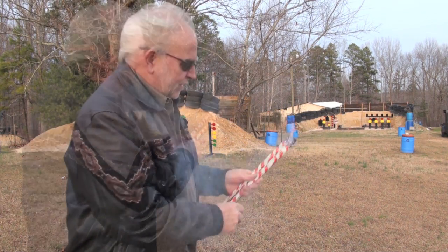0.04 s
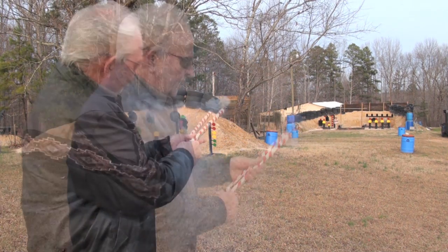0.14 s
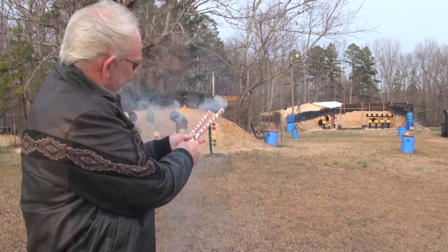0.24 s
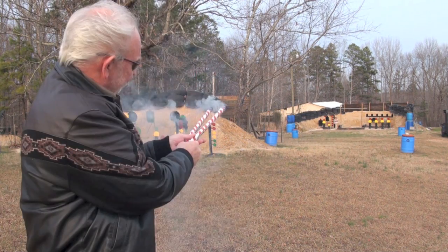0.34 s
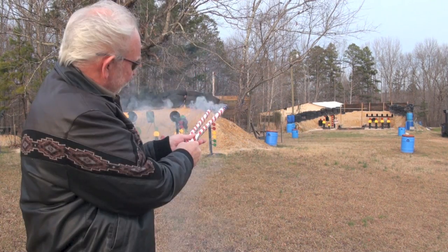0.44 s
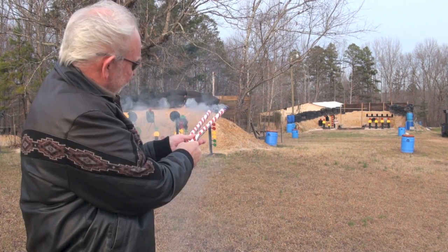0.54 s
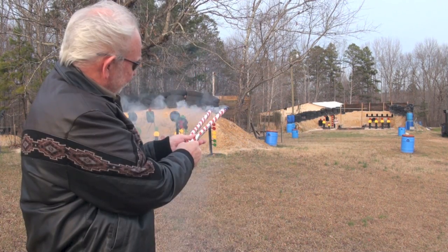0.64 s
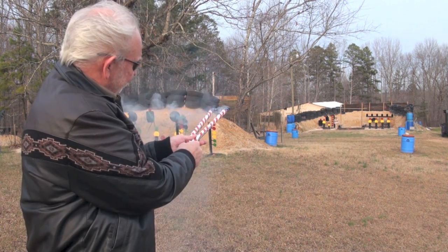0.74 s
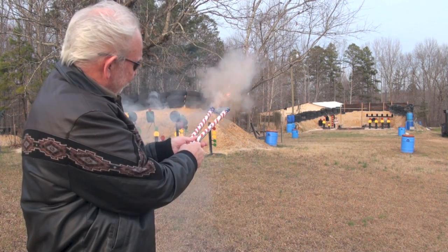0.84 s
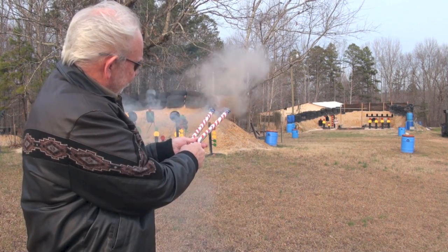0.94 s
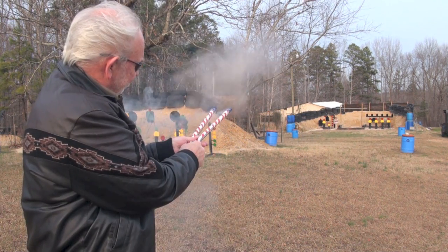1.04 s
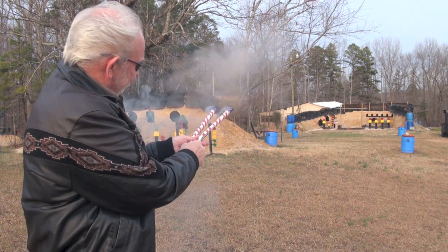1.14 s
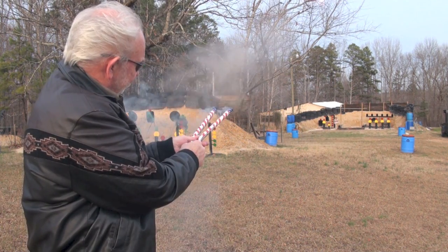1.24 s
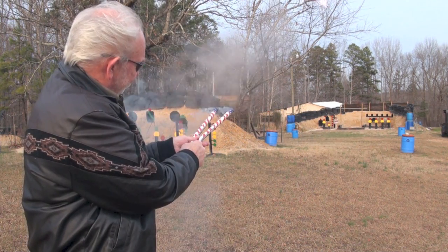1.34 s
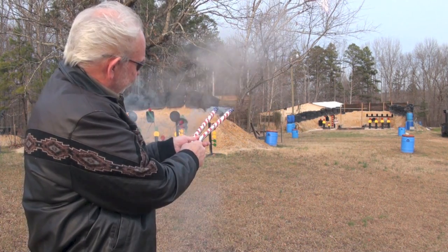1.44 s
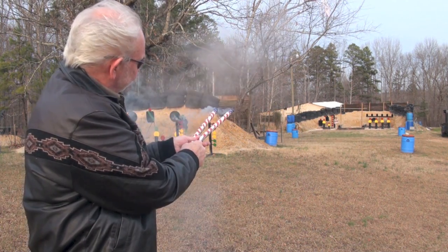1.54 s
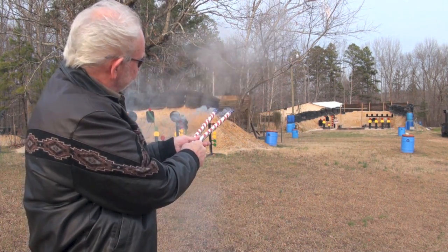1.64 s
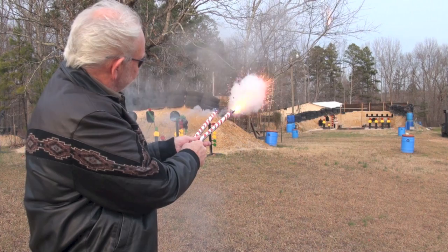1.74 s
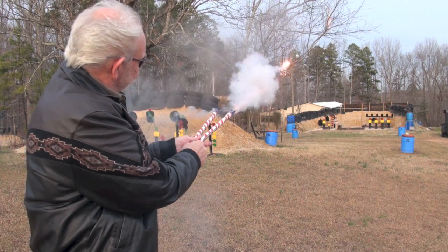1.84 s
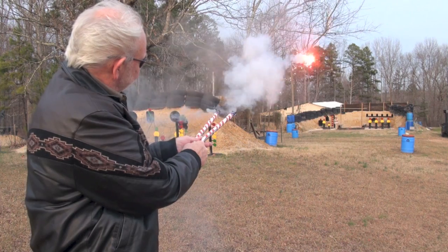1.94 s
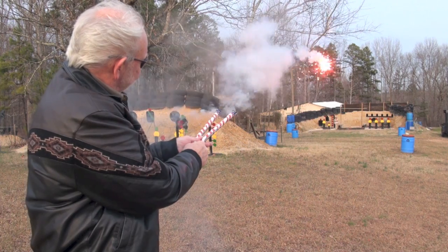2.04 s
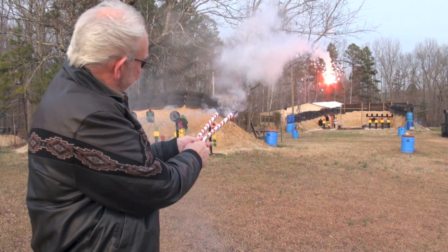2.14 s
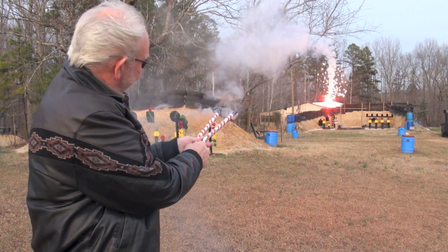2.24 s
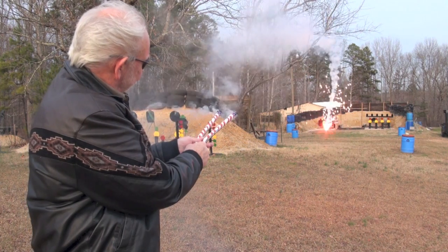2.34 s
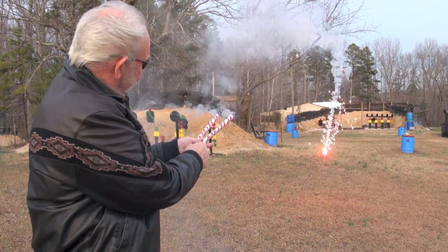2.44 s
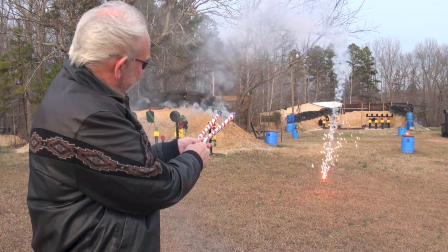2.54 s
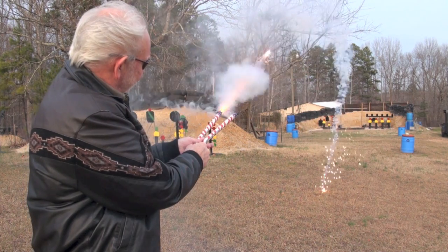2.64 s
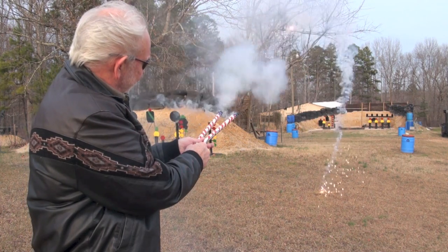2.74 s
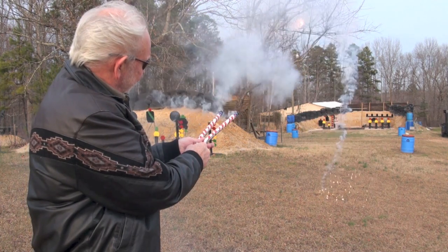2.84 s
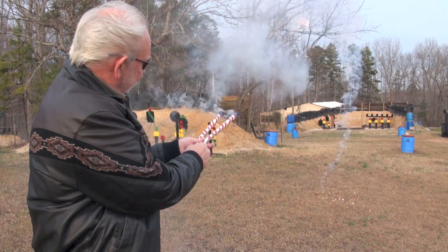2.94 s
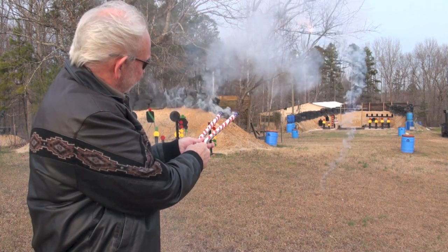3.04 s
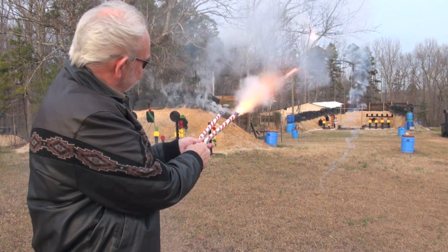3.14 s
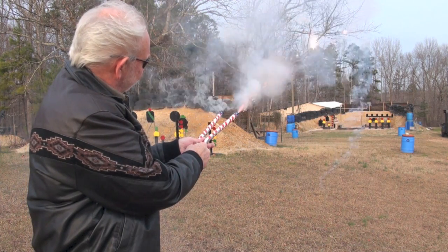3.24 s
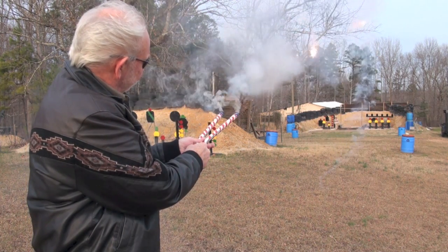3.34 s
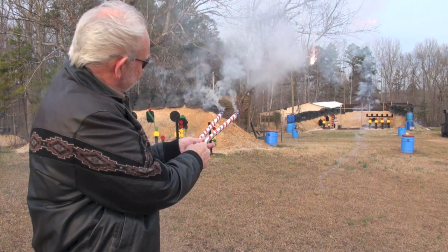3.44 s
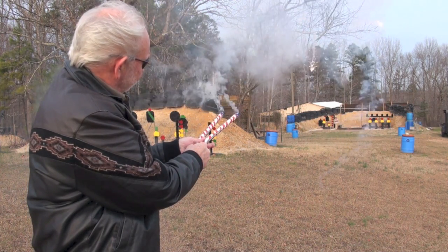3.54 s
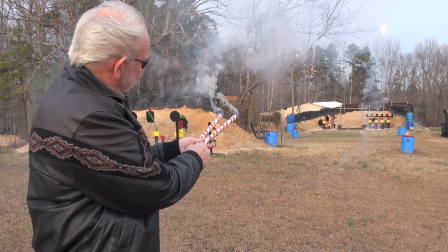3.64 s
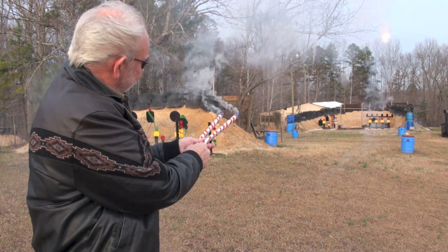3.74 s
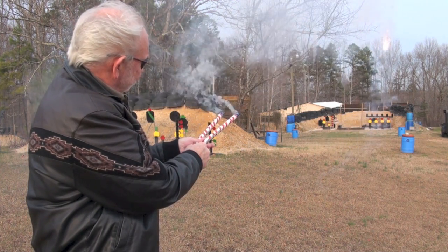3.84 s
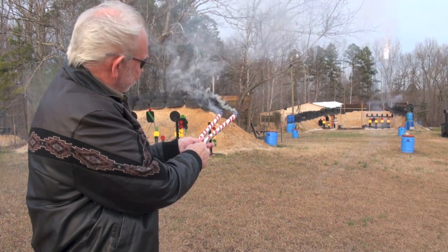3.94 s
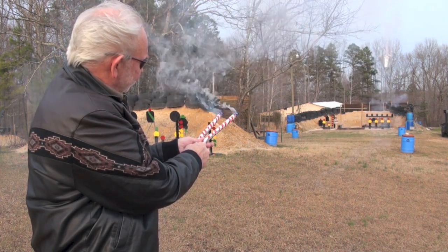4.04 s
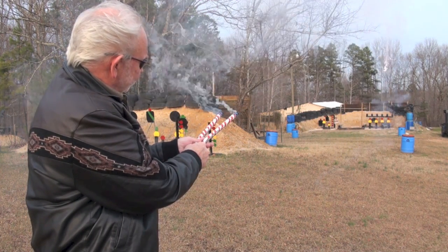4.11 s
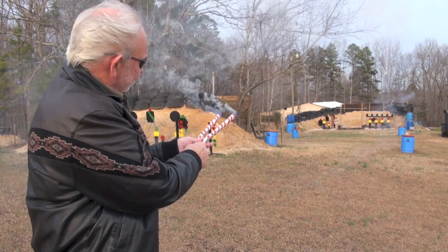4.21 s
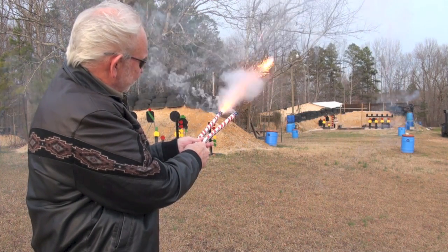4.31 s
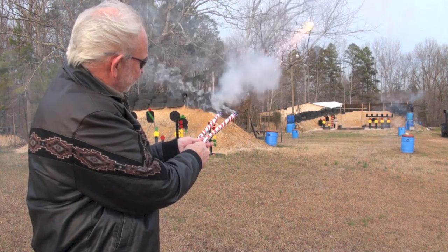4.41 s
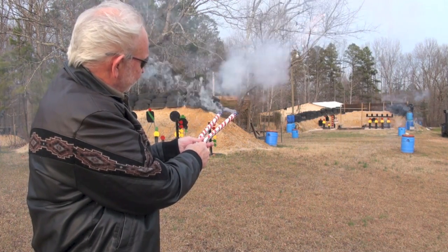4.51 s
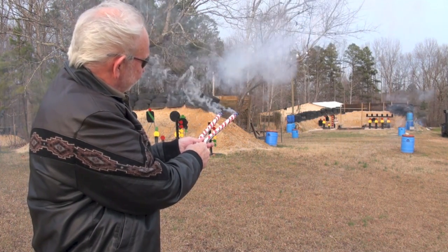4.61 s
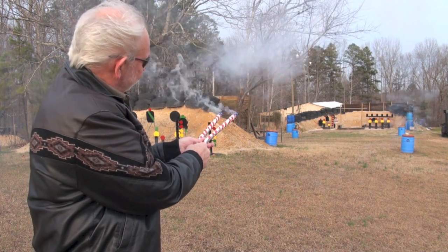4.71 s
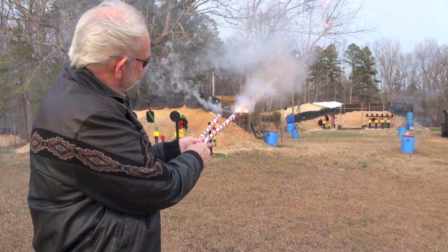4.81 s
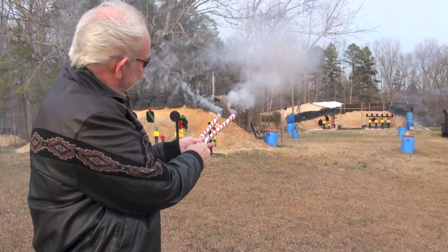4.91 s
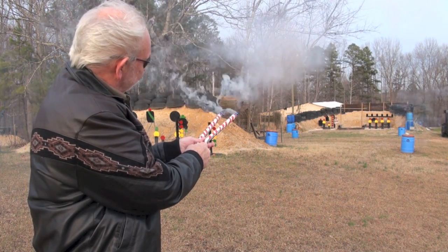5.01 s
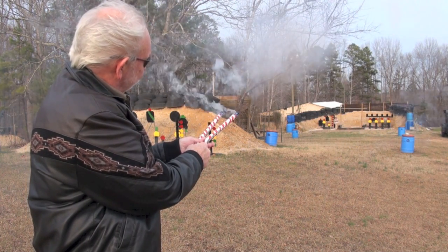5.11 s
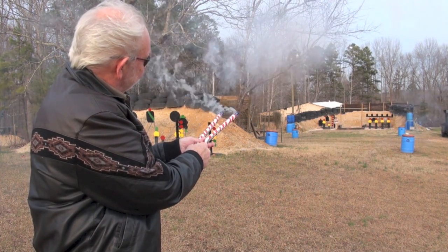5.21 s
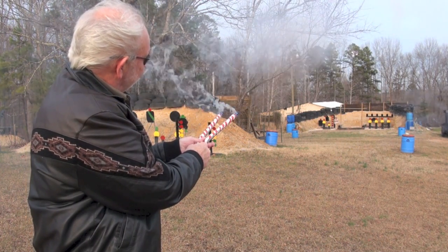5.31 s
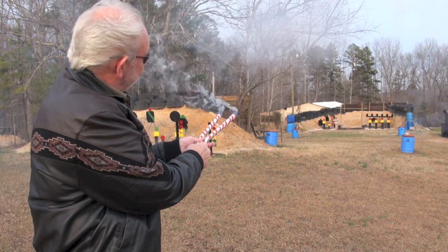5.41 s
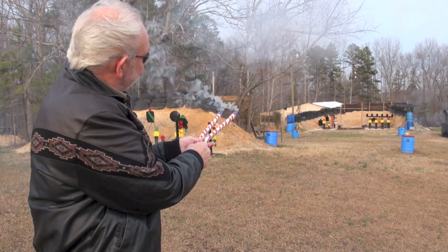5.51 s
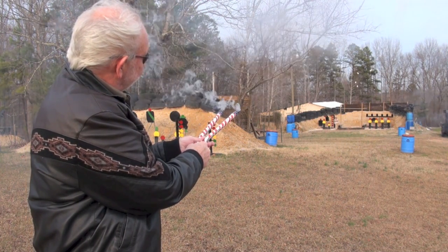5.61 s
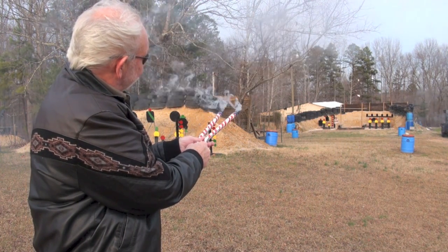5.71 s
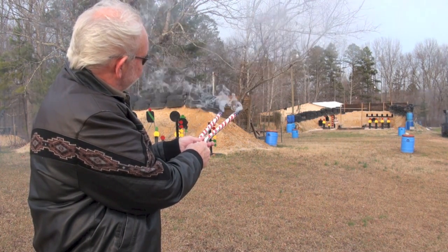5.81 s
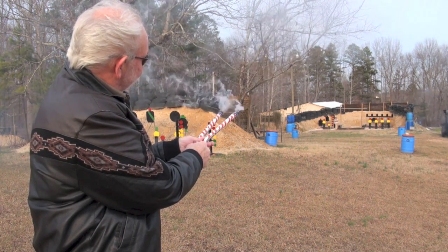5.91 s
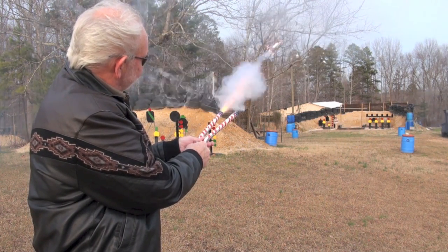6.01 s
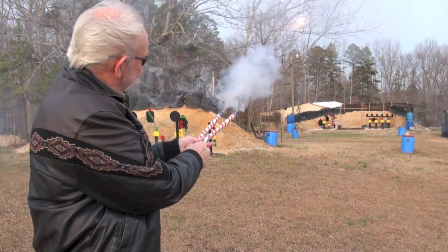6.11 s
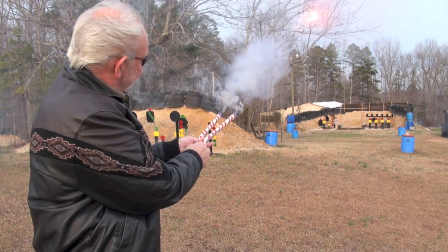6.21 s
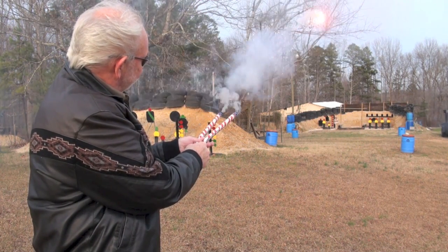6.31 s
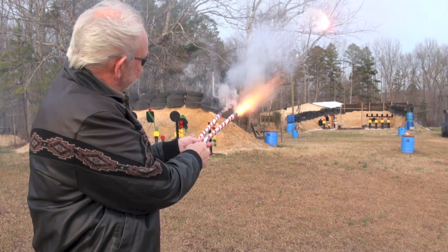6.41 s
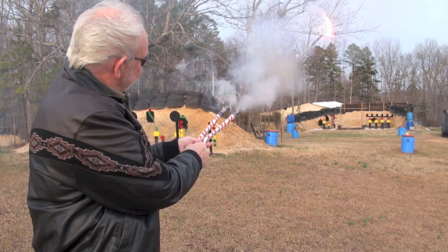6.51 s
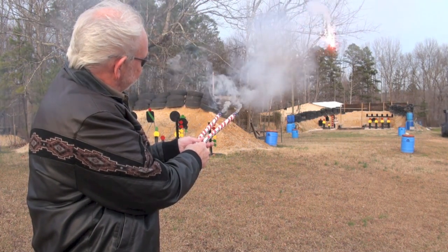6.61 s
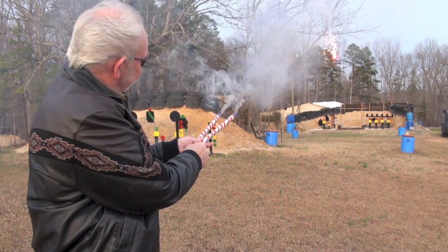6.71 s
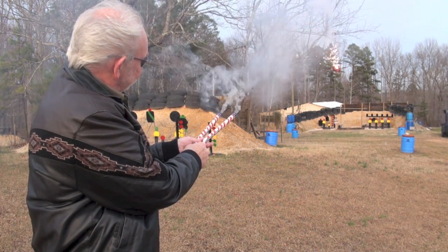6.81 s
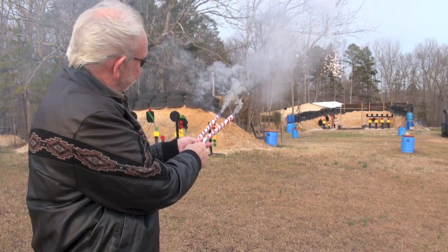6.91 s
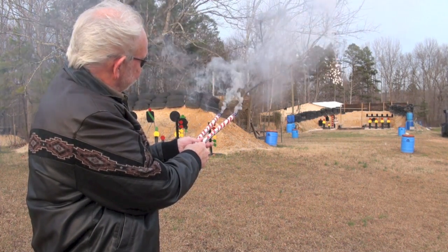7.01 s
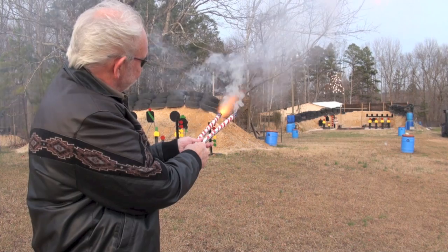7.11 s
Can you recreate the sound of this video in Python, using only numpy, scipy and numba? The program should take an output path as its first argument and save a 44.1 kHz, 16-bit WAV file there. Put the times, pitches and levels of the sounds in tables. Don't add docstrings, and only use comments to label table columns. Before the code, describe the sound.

Irregular hard firework pops with short breathy gas bursts, a steady powder hiss, a faint distant engine drone, and open-field echoes after the hardest shots.

```python
import sys
import numpy as np
from scipy import signal
from scipy.fft import rfft, irfft, next_fast_len
from scipy.io import wavfile
from scipy.ndimage import uniform_filter1d
from numba import njit

SR = 44100
rng = np.random.default_rng(int(sys.argv[2]) if len(sys.argv) > 2 else 0)


def makeup_ratio(level_db):
    decades = np.asarray(level_db, float) / 20
    return 10 ** decades


def generate_wav(signal):
    frames = np.transpose(np.atleast_2d(signal))
    scaled = np.clip(frames, -1, 1) * 32767
    pcm = np.round(scaled).astype(np.int16)
    wavfile.write(sys.argv[1], SR, pcm)


N = 315756
T = np.arange(N) / SR
LONG = next_fast_len(N, True)
LR = np.array([[1.], [-1.]])


def unit(x):
    return x / np.sqrt(np.mean(x ** 2))


def colour(x, points, tilt_db=0):
    hz = np.maximum(np.arange(x.shape[-1] // 2 + 1) * SR / x.shape[-1], 1)
    p = np.array(points)
    db = np.interp(np.log(hz), np.log(p[:, 0]), p[:, 1])
    db = db + tilt_db * np.log2(np.clip(hz, 200, 9000) / 1500)
    return unit(irfft(rfft(x) * makeup_ratio(db), x.shape[-1]))


def low(x, hz, order=1):
    return signal.sosfilt(signal.butter(order, min(hz, SR / 2.2), fs=SR, output="sos"), x)


def walk(rate):
    hold = max(int(SR / rate), 24)
    w = rng.standard_normal(16384)[np.arange(N) // hold]
    w = uniform_filter1d(uniform_filter1d(w, hold), hold)
    return w / w.std()


def add(out, s, piece, pan_db=0):
    i = int(s * SR)
    n = min(piece.shape[-1], N - i)
    out[:, i:i + n] += (piece * makeup_ratio(LR * pan_db / 2))[:, :n]


# t/s, firing rate f/Hz, rumble level/dB, third multiple above it level/dB
ENGINE_RUN = [(0, 44.35, -53, -16), (.3, 44.9, -50, 6), (1.2, 46.26, -41.5, -10), (1.5, 46.7, -41, 1),
              (2.2, 47.7, -38, 0.3), (2.6, 48.48, -37.5, -6), (4.0, 49.77, -38, -8),
              (4.4, 48.6, -40.5, -15), (5.7, 46.05, -41, -15), (7.16, 45.65, -40.5, -20)]
FIRING_ORDERS = (2, 3, 4)
# firing rate f/Hz, gain level/dB
EXHAUST_BOOMS = [
    (45, 16),
    (49.6, 8.5),
]
EVEN_DB, BOOM_WIDTH_HZ = -16.5, 0.56
# f/Hz, level/dB per Hz
RUMBLE_SPECTRUM = [(10, -45), (20, -28), (30, -21), (48, -15.5), (78, -4), (95, -1), (118, -4), (150, 1),
                   (200, -6), (260, -17), (400, -41.5)]
# t/s, f/Hz, level/dB
MACHINE_WHINES = [
    [(0, 336, -73), (5.0, 336, -73), (5.3, 336, -54.5), (6.4, 336, -49), (7.16, 336, -50.5)],
    [(0, 155, -74), (2.1, 155, -62), (2.45, 160, -36), (2.9, 165, -51), (3.4, 160, -48), (3.75, 163, -38),
     (4.2, 170, -54), (4.5, 172, -65), (7.16, 172, -72)],
]


def engine():
    s, *columns = np.transpose(ENGINE_RUN)
    hz, rumble_db, third_db = (np.interp(T, s, c) for c in columns)
    odd_db = rumble_db + third_db
    boom_db = sum(db * np.exp(-((hz - at) / BOOM_WIDTH_HZ) ** 2) for at, db in EXHAUST_BOOMS)
    even_db = rumble_db + EVEN_DB + boom_db
    phase = 2 * np.pi * np.cumsum(hz * (1 + .002 * walk(6))) / SR
    tones = 0
    for k in FIRING_ORDERS:
        order_db = odd_db if k % 2 else even_db
        tones = tones + makeup_ratio(order_db + 1.3 * walk(8)) * np.sin(k * phase)
    for rows in MACHINE_WHINES:
        s, hz, db = np.transpose(rows)
        phase = 2 * np.pi * np.cumsum(np.interp(T, s, hz) * (1 + 0.0033 * walk(12))) / SR
        tones = tones + makeup_ratio(np.interp(T, s, db) + 3.2 * walk(20)) * np.sin(phase)
    mid, side = colour(rng.standard_normal((2, LONG)), RUMBLE_SPECTRUM)[:, :N]
    return makeup_ratio(rumble_db + 0.9 * walk(9)) * (mid + 0.052 * side * LR) + tones


@njit
def tube(x, hz, back, damp):
    y, soft = np.zeros(len(x)), 0.
    for i in range(64, len(hz)):
        at = i - SR / (2 * hz[i]) + damp / (1 - damp)
        j = int(at)
        past = y[j] + (at - j) * (y[j + 1] - y[j])
        soft += (1 - damp) * (past - soft)
        y[i] = x[i] * np.sqrt(1 - back[i] ** 2) - back[i] * soft
    return y


# t/s, level/dB, tilt/dB per octave
POWDER_BURN = [(0, -35, 2.6), (.3, -47.5, -1.5), (.55, -54, -3), (.9, -58, -1.2), (1.08, -51.5, 1.5),
               (1.76, -48, -1.5), (1.92, -39, 0), (2.83, -41.5, -0.7), (2.95, -43, -0.8), (4.31, -46, 1.8),
               (4.44, -46, -2), (4.87, -44, 0.5), (4.99, -40, 1), (5.5, -43, 0.4), (6.02, -50, -1.3),
               (6.54, -43.5, 0), (6.67, -39, -.5), (7.16, -43.5, 1)]
# peak t/s, gain level/dB
POWDER_FLARES = [
    (3.36, 4),
    (6.22, 3.5),
]
FLARE_RISE_S, FLARE_FALL_S = 0.091, 0.19
# t/s, level/dB
ROAD_WASH = [(0, -61), (.45, -46.5), (1.5, -42.5), (3.1, -42), (4.4, -43.5), (5.1, -45.5), (5.9, -50.5),
             (7.16, -45)]
REGION_EDGES_HZ = (250, 1000, 2500, 7000)
BURN_SHARES_DB = (-7, -4, -0.1, -3.5)
ROAD_SHARES_DB = (-0.2, -5.5, -22, -32)
# f/Hz, level/dB per Hz
HISS_SPECTRUM = [(130, -30), (220, 0), (300, -3), (500, 0), (1200, -5), (2500, -8.5), (5000, -9),
                 (9500, -13.5), (11800, -15), (14500, -26), (16000, -37)]
# t/s, f/Hz, reflection/0-1
TUBE_RINGING = [
    [(0, 2270, 0.01), (1.75, 2320, 0), (1.88, 2518, 0.95), (2.05, 2080, 0.52), (2.25, 1840, 0.45),
     (2.65, 1800, 0.32), (2.8, 1800, 0.23), (4.8, 1500, 0), (7.16, 1286, 0)],
    [(0, 1270, 0.18), (.3, 1300, 0), (1.0, 1460, 0.1), (1.75, 1430, 0.56), (1.9, 1450, 0),
     (2.3, 1460, 0.13), (2.8, 1430, 0.17), (3.3, 1420, 0.33), (4.3, 1350, 0.36), (4.5, 1287, 0.13),
     (4.9, 1080, 0.25), (5.7, 1064, 0.38), (6.1, 960, 0.19), (6.8, 890, 0.23), (7.16, 860, 0.3)],
]


def hiss():
    s, *controls = np.transpose(POWDER_BURN)
    burn_db, tilt_db = (np.interp(T, s, c) for c in controls)
    for at, db in POWDER_FLARES:
        width = np.where(T < at, FLARE_RISE_S, FLARE_FALL_S)
        burn_db = burn_db + db * np.exp(-((T - at) / width) ** 2)
    road_db = np.interp(T, *np.transpose(ROAD_WASH))
    octaves = np.log2(np.array(REGION_EDGES_HZ) / REGION_EDGES_HZ[2])
    levels = []
    for burn_share, road_share, octave in zip(BURN_SHARES_DB, ROAD_SHARES_DB, octaves):
        burn = makeup_ratio(burn_db + burn_share + octave * tilt_db)
        road = makeup_ratio(road_db + road_share)
        levels.append(20 * np.log10(np.hypot(burn, road)))

    mid, side = colour(rng.standard_normal((2, LONG)), HISS_SPECTRUM)
    mid = mid[:N] * makeup_ratio(0.74 * walk(400))
    for rows in TUBE_RINGING:
        at, hz, back = np.transpose(rows)
        mid = tube(mid, np.interp(T, at, hz), np.clip(np.interp(T, at, back), 0, .8), 0.48)

    both = rfft([mid, side[:N]], LONG)
    log_hz = np.log2(np.arange(LONG // 2 + 1) * SR / LONG + 1)
    steps = [1 / (1 + np.exp(-13 * (log_hz - np.log2(edge)))) for edge in REGION_EDGES_HZ] + [0]
    sputter, out = walk(14), 0
    for k, (db, wide) in enumerate(zip(levels, (0.33, 0.31, 0.035, 0.012))):
        m, w = irfft(both * (steps[k] - steps[k + 1]), LONG)[:, :N]
        flicker_db = 0.9 * sputter + 1.0 * walk(9)
        out = out + makeup_ratio(db + flicker_db) * (unit(m) + wide * unit(w) * LR)
    return out


FIELD_T60_S, FIELD_DB, FIELD_HZ = 0.38, -26, 2000


def field(x):
    t = T[:SR]
    tail = rng.standard_normal((2, SR)) * makeup_ratio(-60 * t / FIELD_T60_S) * (1 - np.exp(-t / 0.0047))
    tail = low(tail[0] + .5 * tail[1] * LR, FIELD_HZ)
    tail = tail / np.sqrt(np.sum(tail ** 2) / 2)
    return makeup_ratio(FIELD_DB) * signal.fftconvolve(x[None], tail, axes=1)[:, :N]


def pop(hz, db):
    u = (np.arange(1024) / SR - .008) * hz * np.pi
    edge = 4 * u + 1.5
    u = np.where(u > 0, 0.64 * u, u)
    pulse = (1 - 2 * u ** 2) * np.exp(-u ** 2)
    crack = 0.35 * edge * np.exp(-edge ** 2)
    return makeup_ratio(db) * (pulse + crack)


# t/s, echo level/dB, tilt/dB per octave, far echoes level/dB, extra slap level/dB
HARD_SHOTS = [
    (.895, -1.5, 0.5, 0, -0.5),
    (4.8403, -10, -2, -5, 0),
    (6.507, -8.5, -2.5, -3.5, 6),
]
# delay t/s, rush level/dB, slap peak level/dB, slap f/Hz, left minus right level/dB
NEAR_REFLECTORS = [(.0233, -21.5, -9, 1470, 15), (.038, -22.5, -18.5, 1200, 10),
                   (.054, -19.5, -15, 900, 12), (.076, -15, -16.5, 1600, -0.5),
                   (.0845, -14.5, -3.5, 1300, 0.5), (.095, -20, -16, 1400, 3), (.112, -25, -23.5, 800, 3),
                   (.138, -31, -37.5, 900, 2)]
FAR_REFLECTORS = [(.172, -27, -13, 2000, -8), (.190, -27.5, -14, 900, 9), (.216, -26.5, -13, 1610, -5),
                  (.236, -24.5, -9, 2600, -2), (.261, -34, -13, 1900, 2), (.285, -28, -20, 1510, 3),
                  (.332, -28, -19, 900, 2), (.358, -27, -16, 1020, 2), (.385, -33, -24, 2000, 7),
                  (.42, -38, -21, 1200, 5)]
# f/Hz, level/dB per Hz
ECHO_SPECTRUM = [(35, -45), (60, -16), (560, -4), (900, -7.5), (1300, -5), (2250, -6.5), (2800, -13),
                 (4500, -11), (5600, -18), (7400, -20), (9000, -25.5), (13600, -29), (16000, -50)]
# f/Hz, level/dB per Hz
WOODS_SPECTRUM = [(150, -30), (500, -11), (1100, -1.5), (2250, -0.5), (2750, -15.5), (4400, -12.5),
                  (5300, -27), (16000, -47)]
AIR_DB = -29
SMEAR_S, SMEAR_PER_DB = .009, 1.02
WASH_DB, WASH_T60_S, WASH_DELAY_S = -25, 1.68, .17


def echoes():
    out = np.zeros((2, N))
    noise = rng.standard_normal((2, N)) * makeup_ratio(2.86 * walk(350))
    t = np.arange(8192) / SR - .09
    for s, near_db, tilt_db, far_db, sharp_db in HARD_SHOTS:
        for table, gain_db in ((NEAR_REFLECTORS, near_db), (FAR_REFLECTORS, near_db + far_db)):
            for delay, rush_db, slap_db, hz, pan_db in table:
                smear = SMEAR_S * makeup_ratio(SMEAR_PER_DB * (rush_db - slap_db))
                start = s + delay - .09
                i = int(start * SR)
                mid, side = colour(noise[:, i:i + len(t)], ECHO_SPECTRUM, tilt_db + AIR_DB * delay / 3)
                shape = np.exp(-np.where(t < 0, .5, .2) * (t / max(smear, 1e-3)) ** 2)
                add(out, start, makeup_ratio(rush_db + gain_db) * shape * (mid + .3 * side * LR), pan_db)
                peak_db = slap_db + gain_db + sharp_db * (1.3 - delay / .25)
                add(out, s + delay - .008, pop(hz * 2 ** (.1 * tilt_db), peak_db), pan_db)
        mid, side = colour(rng.standard_normal((2, 32768)), WOODS_SPECTRUM, tilt_db - .6)
        late = T[:len(mid)]
        decay = makeup_ratio(WASH_DB + near_db + far_db - 60 * late / WASH_T60_S)
        swell = (1 - np.exp(-late / .02)) * decay
        add(out, s + WASH_DELAY_S, swell * (mid + 0.13 * side * LR))
    return out


GROUND_S, GROUND_DB, GROUND_HZ = .00483, -5, 3550


def ground(x, db):
    return x + makeup_ratio(db) * low(np.interp(T - GROUND_S, T, x, left=0), GROUND_HZ)


# peak t/s, hold t/s, level/dB, tilt/dB per octave
GAS_SPITS = [(0.889, 0.0013, -34, 3), (0.8944, 0.0011, -6.5, 3), (1.785, 0.014, -23.5, 4),
             (2.669, 0.015, -21, 3), (3.202, 0.0034, -15.5, -1), (4.369, .0073, -17, 2.5),
             (4.818, 0.0046, -33, 0), (4.829, 0.002, -16, 0), (6.025, 0.016, -20, 3),
             (6.495, 0.0053, -22, -1.5), (6.895, 0.0017, -20.5, 4.5)]
SPIT_RISE, SPIT_T60_S, SPIT_T60_PER_HOLD = 0.34, 0.013, 1.7
# peak t/s, hold t/s, t60 t/s, level/dB, tilt/dB per octave
GAS_BLASTS = [(0.904, .012, .093, -24, 4), (1.798, 0.03, .34, -16.5, -.5), (1.932, 0.074, 0.4, -39, 2.5),
              (2.687, .022, .17, -14.5, -0.5), (2.773, .008, .1, -42, 10), (3.212, 0.022, 0.2, -18, -1),
              (4.381, 0.012, .14, -15, -.5), (4.447, .025, .14, -34, -1.5), (4.839, 0.0064, 0.06, -15, 1.5),
              (6.043, 0.031, .14, -12.5, .5), (6.16, .006, 0.067, -39.5, 2), (6.197, .005, .05, -47, 6.5),
              (6.507, 0.0066, 0.068, -18, 2), (6.908, 0.013, .12, -29, 4.5)]
BLAST_RISE = 0.14
# start t/s, length t/s, level/dB, tilt/dB per octave
FIZZ_TRAILS = [
    (.18, .29, -45.5, 5),
    (2.77, 0.2, -42, 11),
    (4.406, .098, -41.5, 12),
    (4.858, .092, -31.5, 6),
    (6.1, 0.11, -47.5, 13),
    (6.53, 0.077, -34.5, 3),
]
TRAIL_RISE_S, TRAIL_T60_S = 0.009, .06
# peak t/s, rise t/s, hold t/s, t60 t/s, level/dB, tilt/dB per octave
FUSE_FLARE = (0.3, .28, -0.07, 0.34, -38.5, 4)


def jet_rows():
    rows = []
    for s, hold, db, tilt in GAS_SPITS:
        rows.append((s, SPIT_RISE * hold, hold, SPIT_T60_S + SPIT_T60_PER_HOLD * hold, db, tilt))
    for s, hold, t60, db, tilt in GAS_BLASTS:
        rows.append((s, BLAST_RISE * hold, hold, t60, db, tilt))
    for s, hold, db, tilt in FIZZ_TRAILS:
        rows.append((s, TRAIL_RISE_S, hold, TRAIL_T60_S, db, tilt))
    return rows + [FUSE_FLARE]


# t/s, peak level/dB, f/Hz, left minus right level/dB
PRESSURE_POPS = [(.8952, -2, 2200, 0), (.9000, -3, 1400, 0), (1.7820, -11, 1400, 0), (1.7966, 0, 3400, 0),
                 (2.6758, -10, 1200, 0), (2.6812, -2, 1300, 0), (3.2071, -5, 1300, 0),
                 (3.2139, -2, 1200, 0), (4.3737, -7, 3000, 0), (4.3790, -2, 1300, 0), (4.8328, -10, 900, 0),
                 (4.8340, -10, 800, 0), (4.8404, -4, 2000, 0), (4.8456, -5, 1000, 0), (6.0298, -6, 3000, 0),
                 (6.0350, -3, 1200, 0), (6.5068, -3, 1300, 0), (6.5116, -1, 1500, 0), (.898, -17, 230, 0),
                 (4.844, -14, 240, 0), (6.510, -15, 250, 0), (6.8952, -2.5, 2500, -2),
                 (6.8991, -8, 1200, -2)]
# f/Hz, level/dB per Hz
JET_SPECTRUM = [(35, -43), (60, -11), (398, -1.5), (1250, -3.5), (1950, -4.5), (2650, -5.5), (3120, -9.5),
                (4320, -9), (10800, -17.5), (14600, -23.5), (16000, -50)]


def launches():
    grit = rng.standard_normal(N) * makeup_ratio(1.84 * walk(900))
    jets, out = np.zeros((2, N)), np.zeros((2, N))
    t = np.arange(16384) / SR - .05
    for s, rise, hold, t60, db, tilt_db in jet_rows():
        i = int((s - .05) * SR)
        gas = colour(np.resize(grit[i:], len(t)), JET_SPECTRUM, tilt_db)
        dull = low(gas, 3200)
        bright = gas - dull
        fade_db = 60 * np.maximum(t - hold, 0) / max(t60, .005)
        shape = np.exp(np.minimum(t, 0) / max(rise, 3e-4))
        add(jets, s - .05, makeup_ratio(db) * shape * (dull * makeup_ratio(-fade_db) + bright * makeup_ratio(-1.6 * fade_db)))
    out += ground(jets[0], GROUND_DB) * makeup_ratio(-0.5)
    for s, db, hz, pan_db in PRESSURE_POPS:
        add(out, s - .008, pop(hz, db), pan_db)
    return out


def scene():
    tubes = launches()
    return tubes + field(tubes.mean(axis=0)) + echoes() + hiss() + engine()


def roll_off(x):
    return signal.sosfilt(signal.butter(12, 16470, fs=SR, output="sos"), x)


def record(dry):
    side = (dry[0] - dry[1]) / 2
    close = dry - 1.13 * low(side, 290) * LR
    rounded = np.tanh(0.69 * close) / 0.71
    top_cut = signal.ellip(8, .2, 60, 15850, fs=SR, output="sos")
    mix = signal.sosfilt(top_cut, rounded)
    return roll_off(mix)


dry = scene()
out = record(dry)
generate_wav(out)
```